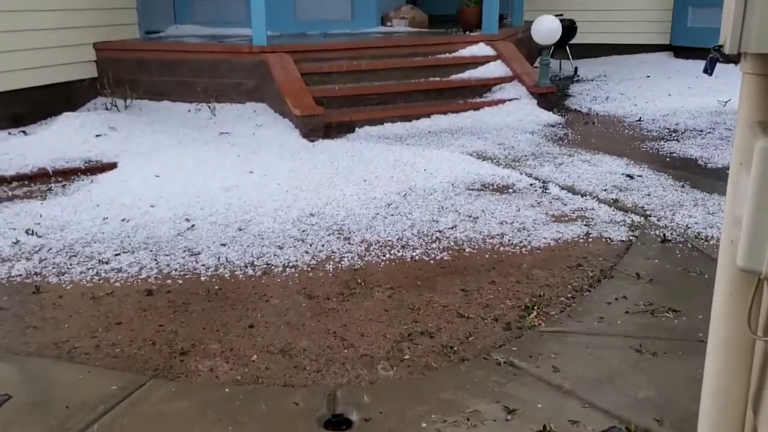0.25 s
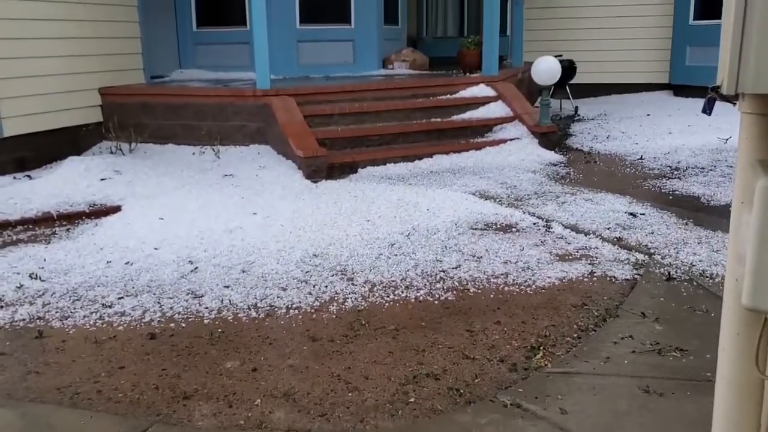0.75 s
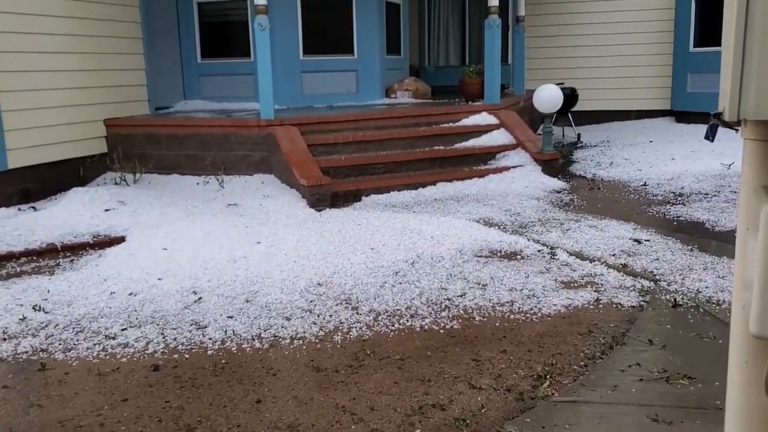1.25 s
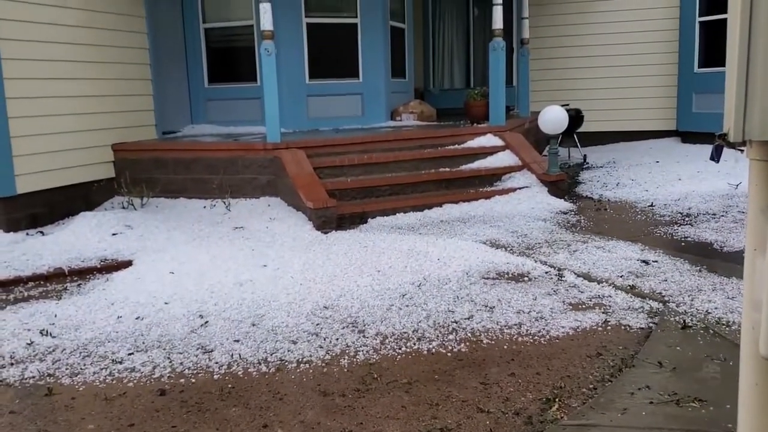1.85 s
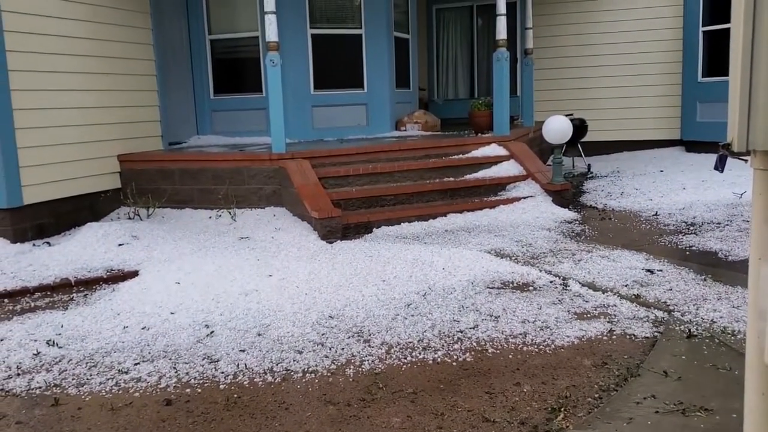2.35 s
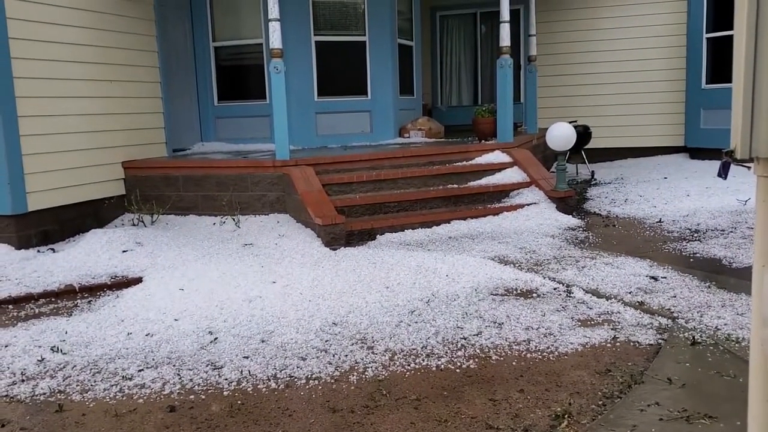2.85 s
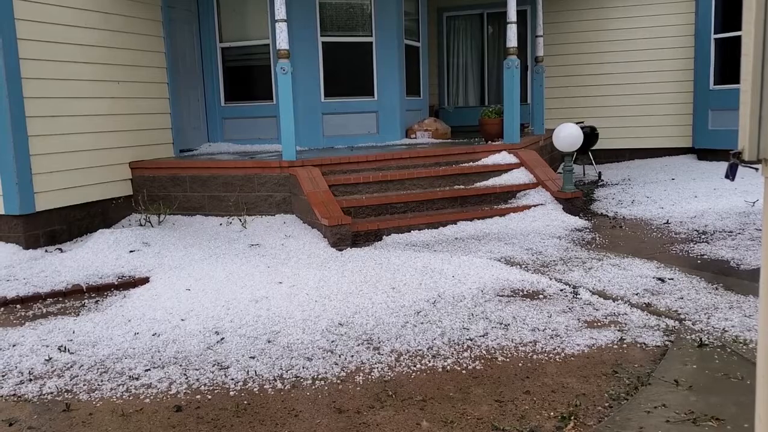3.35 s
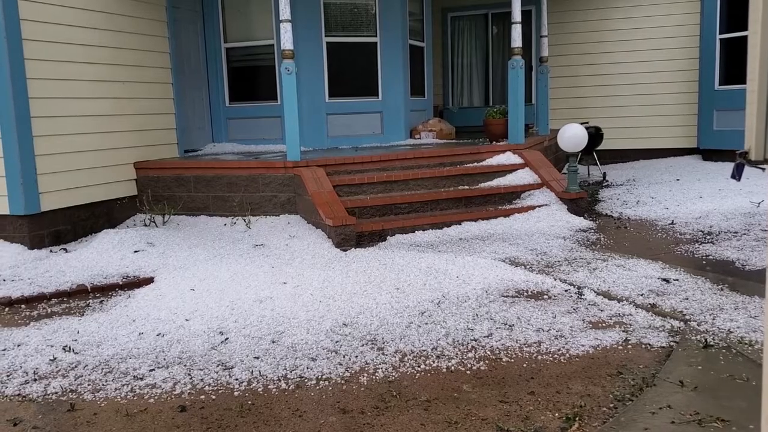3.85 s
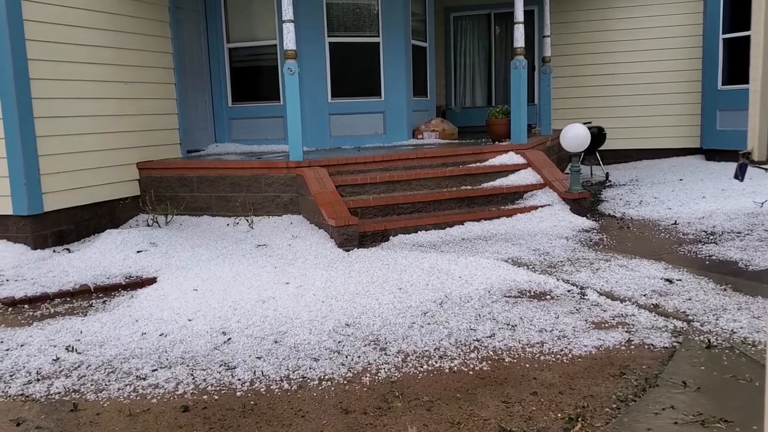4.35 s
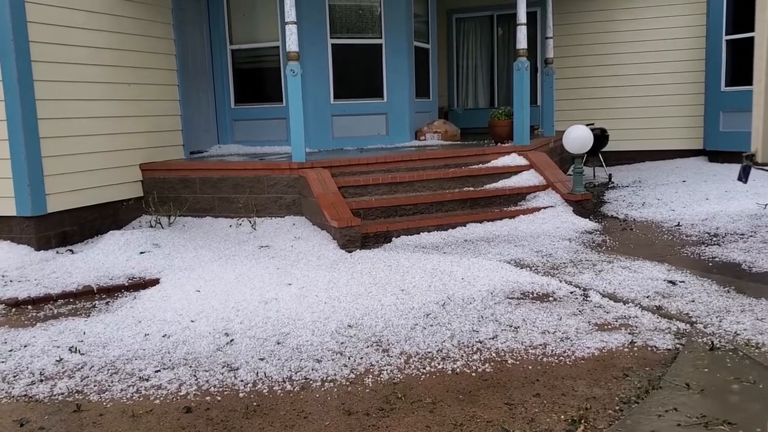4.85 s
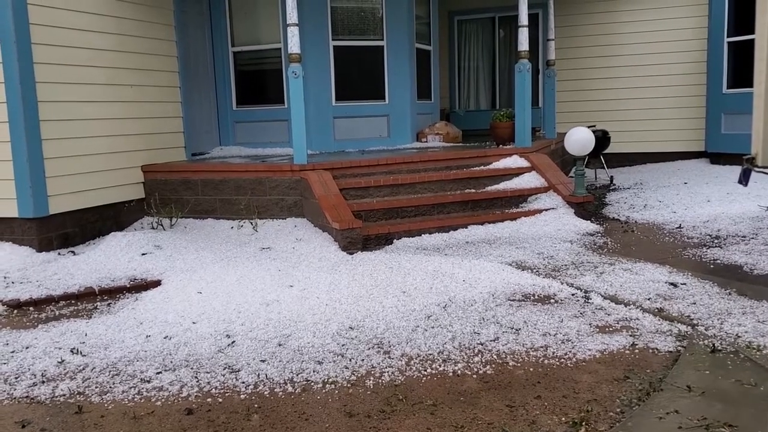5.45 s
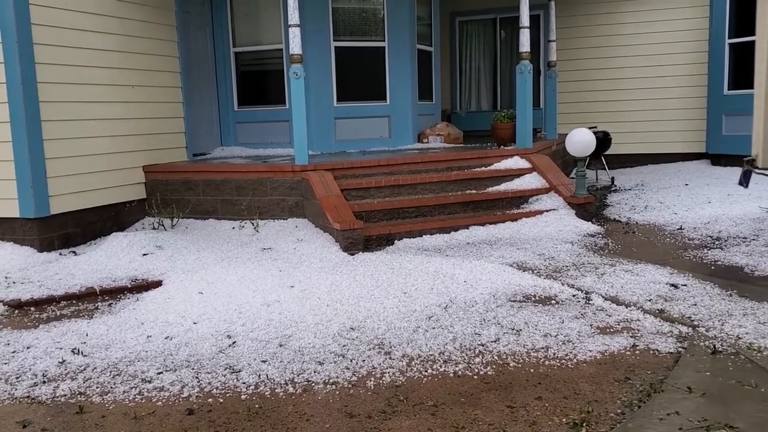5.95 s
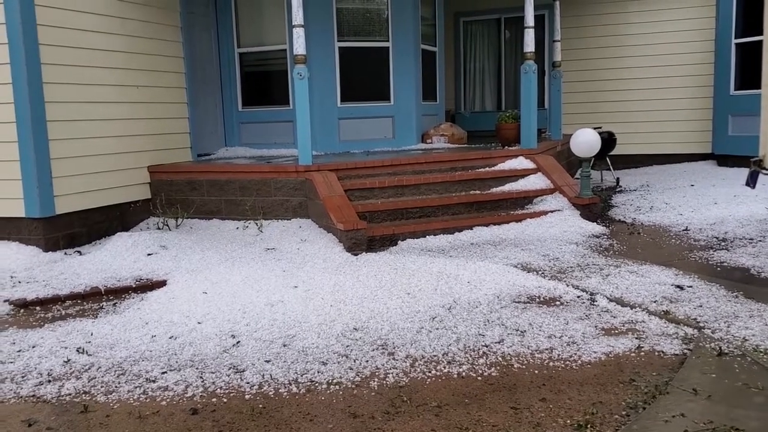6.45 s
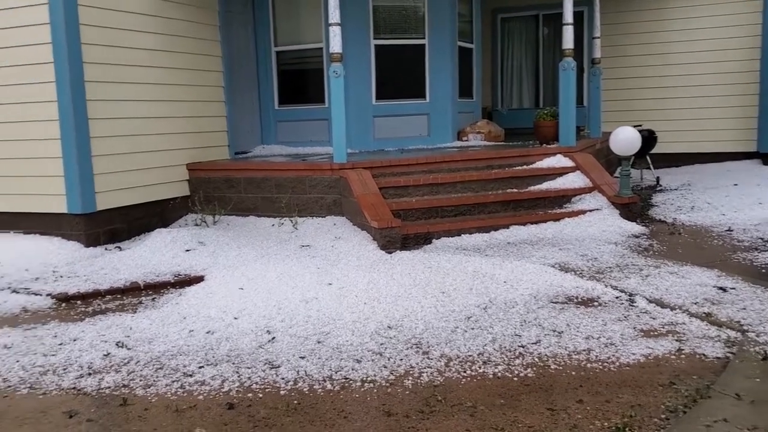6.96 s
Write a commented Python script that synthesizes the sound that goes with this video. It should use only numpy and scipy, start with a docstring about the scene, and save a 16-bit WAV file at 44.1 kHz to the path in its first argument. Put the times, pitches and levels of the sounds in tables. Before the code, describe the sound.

Outdoors by a house porch, close drops fall irregularly from the roof edge onto wet concrete, making crisp ticks and small bright splashes, some with a short hollow downpipe ring. Fine rain hisses quietly throughout with light patter. A deep, fluttering rumble surges beneath, stronger around three to four seconds and six. A few dull knocks on boards sit left. Close stereo microphones, only brief reflections.

```python
"""Rain after a hailstorm, heard from under a porch roof: drips splatter on concrete, a downpipe and boards,
finer rain hisses over the yard, and the storm rumbles low. Drops are bursts of impulses that excite
damped resonances; the hiss is patchy shaped noise with ticks; the storm is low noise over a wavering sine.
The two microphones sit a hand apart, so near drops reach the right one up to 0.43 ms late."""
import sys
import numpy as np
from scipy import signal
from scipy.fft import rfft, irfft, next_fast_len
from scipy.io import wavfile
from scipy.ndimage import uniform_filter1d, map_coordinates

SR = 44100
rng = np.random.default_rng(int(sys.argv[2]) if len(sys.argv) > 2 else 0)


def store_wav(level_fs):
    """Save 16-bit WAV to argv[1]."""
    pcm = np.round(np.clip(np.atleast_2d(level_fs), -1, 1) * 32767)
    wavfile.write(sys.argv[1], SR, pcm.T.astype(np.int16))


def voltage_ratio(decibels):
    """Convert decibels (scalar or array-like) to amplitude ratios, 20 dB per decade."""
    exponent = np.asarray(decibels, float) / 20
    return 10 ** exponent


N = 317961  # samples

# strength of the fine rain, which also scales the patter, and balance of the rain: start_s, level_db, left_right_db
RAIN_COURSE = [(0.0, -40.5, 1), (0.78, -41.5, 1), (1.2, -40, 1), (2.1, -42, 1), (2.99, -41, 0.5),
               (3.49, -41.5, 1), (4.5, -40.5, 1), (4.9, -37.5, 3), (6.04, -39, 3.5), (6.85, -37.5, 2.5),
               (7.21, -37.5, 3.5)]


def unit(x):
    """Normalization: scales a signal to rms 1."""
    return x / np.sqrt(np.mean(x ** 2) + 1e-20)


def along(points, hz):
    """Interpolates (frequency_hz, value) points on a logarithmic frequency axis."""
    point_hz, value = np.transpose(points)
    return np.interp(np.log(hz + 1), np.log(point_hz + 1), value)


def curves(rows):
    """Linear interpolation in time: one value per sample for each column after the time."""
    s, *columns = np.transpose(rows)
    return [np.interp(np.arange(N) / SR, s, column) for column in columns]


def filtered(x, response):
    """Linear filtering: multiplies the spectrum by a response that is a function of frequency in Hz."""
    size = next_fast_len(N + 8192)
    hz = np.fft.rfftfreq(size, 1 / SR)
    return irfft(rfft(x, size) * response(hz), size)[..., :N]


def sides(pan_db):
    """Intensity stereo: left and right gains for a left-right level difference."""
    return voltage_ratio(np.array([pan_db / 2, -pan_db / 2]))


def wobble(knots_per_s):
    """Random modulation: a smooth curve through normal random knots, at most 25 a second."""
    position = np.arange(N) * np.clip(knots_per_s, 1, 25) / SR
    return map_coordinates(rng.standard_normal(200), [position])


def rush(spectrum, patchy_db):
    """Shaped noise of rms 1: random time-frequency patches, and mid/side weights that set the ears' coherence."""
    # likeness of left and right, from -1 opposite to 1 equal: frequency_hz, likeness
    likeness = [(60, 1), (110, 0.94), (200, 0.87), (380, 0.83), (700, 0.43), (1290, -0.58), (2380, 0.32),
                (4400, -0.29), (8120, 0.0034), (15000, -0.17)]
    cells = signal.stft(rng.standard_normal((2, N)), nperseg=512)[2]
    field = uniform_filter1d(rng.standard_normal(cells.shape[1:]), 6, 0)
    field = unit(uniform_filter1d(field, 10, 1))
    pair = signal.istft(cells * voltage_ratio(patchy_db * field), nperseg=512)[1][:, :N]

    def mid_side_response(hz):
        # mid power minus side power gives the likeness
        angle = np.arccos(np.clip(along(likeness, hz), -1, 1)) / 2
        return voltage_ratio(along(spectrum, hz)) * [np.cos(angle), np.sin(angle)]

    mid, side = filtered(pair, mid_side_response)
    return unit(np.array([mid + side, mid - side]))


def storm():
    """Noise roll and frequency-modulated boom: each surge of the boom lifts the roll a little."""
    # sine amplitude before its surges, pitch before its sway: start_s, level_db, pitch_hz
    boom_course = [(0, -32, 57), (.12, -50, 57.5), (.22, -31.5, 61.8), (.8, -52, 65.2), (1.45, -38, 73.4),
                   (1.85, -35.5, 63.55), (2.25, -32, 60.03), (2.39, -76, 61.7), (2.49, -25, 64.95),
                   (2.68, -43, 68.2), (2.77, -25, 71), (2.88, -54, 61.65), (2.96, -26.5, 71.4),
                   (3.01, -45, 66), (3.08, -24, 72.3), (3.17, -37, 81.6), (3.24, -22, 95.6),
                   (3.31, -45, 80.5), (3.4, -37, 67), (3.47, -25, 66.3), (3.53, -40, 65.7), (3.6, -30, 66),
                   (3.75, -28.5, 64.7), (3.82, -20, 63.8), (3.87, -41, 65.7), (3.92, -25.5, 65.9),
                   (4.1, -61, 71), (4.2, -34, 64.6), (4.42, -25.5, 60.7), (4.9, -32.5, 56.4),
                   (5.3, -26, 55.37), (6.03, -23.5, 54.06), (6.1, -15, 58.2), (6.2, -28, 58),
                   (6.26, -28, 75.5), (6.33, -33, 60.03), (6.4, -34, 79.96), (6.47, -29, 64.76),
                   (6.56, -27, 63.9), (6.74, -33, 64.76), (6.84, -22, 66.03), (7.07, -24, 60.97),
                   (7.21, -38, 51)]
    # balance of the boom: start_s, left_right_db
    drift = [(0, -1), (4, 1.5), (5.5, -3), (7.21, -0.5)]
    # rms of the roll before its flutter and lift: start_s, level_db
    rumble_course = [(0, -37), (.3, -32), (1, -34.5), (1.58, -32), (2.4, -32.5), (3.2, -31.5), (4.1, -35),
                     (5.2, -32), (6.04, -32), (6.1, -29), (6.17, -32), (7.21, -34)]
    # relative spectrum of the roll: frequency_hz, level_db
    roll_spectrum = [(15, -40), (25, -28), (43, -4.5), (65, -1), (130, -8.5), (166, -9), (298, -20.5),
                     (339, -17), (380, -23.5), (426, -21.5), (560, -32), (738, -29.5), (1200, -34.5),
                     (1560, -66), (2640, -120)]
    # the higher rumble leans left: frequency_hz, left_right_db
    lean = [(100, 0), (400, 1)]
    surge_base_db, surges_per_s = 1.6, 22  # random knots a second
    steady_db, surge_per_db = -9, 0.09  # the surges deepen by this much per dB the boom lies under steady_db
    flutter_db, flutters_per_s = 1.5, 12
    bass_hz = 33.7  # half amplitude here, less below

    rumble_db, = curves(rumble_course)
    boom_db, pitch_hz = curves(boom_course)
    surge_depth_db = np.clip(surge_base_db + surge_per_db * (steady_db - boom_db), 0, 8)
    boom_db = boom_db + surge_depth_db * wobble(surges_per_s)
    rumble_db = rumble_db + flutter_db * wobble(flutters_per_s)
    surge_db = boom_db - uniform_filter1d(boom_db, SR // 2)
    roll = voltage_ratio(rumble_db + 0.056 * surge_db) * rush(roll_spectrum, patchy_db=0.5)

    # slow random phase: one part common to both ears, one apart for each
    sway = filtered(rng.standard_normal((3, N)), lambda hz: 1 / (1 + (hz / 12) ** 2))
    phase = 2 * np.pi * np.cumsum(pitch_hz) / SR
    phase = phase + 0.95 * unit(sway[0]) + 0.5 * unit(sway[1:])
    boom = voltage_ratio(boom_db) * sides(curves(drift)[0]) * np.sin(phase)
    return filtered(roll + boom, lambda hz: sides(along(lean, hz)) / (1 + (bass_hz / (hz + 1)) ** 3))


def hiss():
    """Superposition of fine rain over yard and roofs: a noise wash with countless tiny decaying ticks in it."""
    # relative spectrum of the fine rain: frequency_hz, level_db
    spectrum = [(290, -0.5), (500, -0.5), (554, -1.5), (742, 1.5), (924, -2), (1290, 0.5), (2220, -1),
                (2610, -3.5), (4050, -2), (6100, -4.5), (7000, -8), (8060, -8.5), (9200, -10),
                (11400, -5.5), (15100, -9), (15800, -5), (16500, -56)]
    hiss_db, pan_db = curves(RAIN_COURSE)
    size = voltage_ratio(4 * np.clip(rng.standard_normal((2, N)), -2, 2))
    impulses = (rng.random((2, N)) < 500 / SR) * size  # about 500 a second at each ear
    t = np.arange(256) / SR
    tick = voltage_ratio(-60 * t / .004) * rng.standard_normal((2, len(t)))  # falls 60 dB in 4 ms
    ticks = signal.fftconvolve(impulses, tick, axes=1)[:, :N]
    ticks = unit(filtered(ticks, lambda hz: voltage_ratio(along(spectrum, hz)) * np.clip(hz / 2500, 0, 1) ** 2))
    wash = rush(spectrum, patchy_db=2.17)
    return voltage_ratio(hiss_db) * sides(pan_db) * (wash + voltage_ratio(-8.5) * ticks)


def splats(s, sharp, bodies, echo_db, spread_s):
    """Impulse excitation of resonances: a blow among droplets sounds its bodies (dB, Hz, width Hz, t60 s)."""
    length, lead, droplets = 4096, 512, 28  # samples, samples kept ahead of the blow, count
    ear_lag_s = .00043  # largest delay at the right microphone
    span_s = .006  # a body's dB is its energy spread evenly over this time
    wall_s, wall_db, wall_hz = .0065, -7, 4500  # mean delay, level, pitch where the wall's dulling halves the echo
    t, f = np.arange(length - lead) / SR, np.fft.rfftfreq(length, 1 / SR)

    # sharp is the share of energy in the one blow; the sharper, the closer the droplets
    when, size, side = rng.standard_normal((3, len(s), droplets))
    sharp = np.clip(sharp, 0, 1)[:, None]
    when = spread_s * (1.2 - sharp) * (np.abs(when) - .5 * (1 - sharp))
    when = np.column_stack([0 * s, np.clip(when, -lead / SR, None)])
    size = np.column_stack([np.sqrt(sharp), np.sqrt((1 - sharp) / droplets) * size])
    lag = ear_lag_s * np.column_stack([0 * s + 1, np.abs(np.tanh(side + .5))])
    blows = np.zeros((2, len(s), length))
    for ear, late in zip(blows, (0, lag)):
        place = lead + np.round((when + late) * SR).astype(int)
        np.add.at(ear, (np.arange(len(s))[:, None], place), size)
    struck = rfft(blows)

    # a near wall sends each drop back once
    wall_delay = wall_s * (.9 + .2 * rng.random((len(s), 1)))
    wall = voltage_ratio(wall_db) * np.exp(-2j * np.pi * f * wall_delay) / (1 + (f / wall_hz) ** 2)
    total = 0
    for level_db, hz, width, t60 in bodies:
        # the porch answers each blow with a short noisy tail
        tail = voltage_ratio(echo_db - 60 * t / t60) * rng.standard_normal((2, len(s), len(t)))
        answer = 1 + wall + rfft(tail * (1 - np.exp(-t / 0.00029)), length)
        hz, width = np.reshape(hz, (-1, 1)), np.reshape(width, (-1, 1))
        resonance = 1j * f * width / (hz * hz - f * f + 1j * f * width)
        ring = resonance ** 2 * answer * struck  # applied twice
        energy = 2 * np.sum(np.abs(ring) ** 2, (0, 2)) / (2 * length)  # mean of the two ears
        total = total + (voltage_ratio(level_db) * np.sqrt(span_s * SR / energy))[:, None] * ring
    sound = irfft(total, length)
    place = np.round(s * SR).astype(int)[:, None] + np.arange(length)
    return np.array([np.bincount(place.ravel(), ear.ravel(), N + 2 * length)[lead:N + lead] for ear in sound])


def drops(rows, echo_db, spread_s, modes=()):
    """Modal sum for water on concrete: a pitched splash with an overtone, a bright spray, the downpipe's ring."""
    s, pipe_db, splash_db, hz, spray_db, sharp = np.transpose(rows)
    overtone = 1.47 + .12 * rng.random(len(s))
    bodies = [(pipe_db, 2250, 560, .1)]
    bodies += [(pipe_db + db, *mode) for db, *mode in modes]
    bodies += [(splash_db, hz, .3 * hz, .08), (splash_db - 4.5, hz * overtone, .3 * hz, .08)]
    bodies += [(spray_db, 11500, 6000, .06)]
    return sides(curves(RAIN_COURSE)[1]) * splats(s, sharp, bodies, echo_db, spread_s)


def patter(count=800):
    """Random superposition: many small drops of random size and colour, louder as the shower thickens."""
    s, sharp = rng.random((2, count))
    size_db = 3.2 * np.clip(rng.exponential(size=count), 0, 2.1)
    pipe, splash, pitch, spray = rng.standard_normal((4, count))
    # levels are relative to the course of the shower
    pipe_db = size_db - 28.0 + 5 * pipe
    splash_db = size_db - 11.5 + 4 * splash
    spray_db = size_db - 16.0 + 4 * spray
    pitch_hz = 4600 * np.exp(.3 * pitch)
    rows = np.column_stack([s * N / SR, pipe_db, splash_db, pitch_hz, spray_db, .6 * sharp])
    return voltage_ratio(curves(RAIN_COURSE)[0]) * drops(rows, echo_db=-28, spread_s=.004)


def drips():
    """Impact spectra of loud drops from the roof edge: louder and brighter ones are sharper blows, faintly echoed."""
    # near drips, levels before panning: start_s, pipe_db, splash_db, splash_pitch_hz, spray_db
    near_drips = [(0.005, -48.5, -38.5, 4940, -34.5), (0.1116, -59, -32.5, 3460, -39),
                  (0.1204, -59, -39.5, 3580, -38.5), (0.184, -65, -37, 3340, -38.5),
                  (0.26, -46, -38, 3430, -46.5), (0.335, -64, -42, 5900, -41),
                  (0.444, -64, -42.5, 5500, -28), (0.618, -60, -50, 6000, -45),
                  (0.747, -64, -45, 4860, -37), (1.1, -41.5, -33.5, 4400, -41.5),
                  (1.115, -47, -36.5, 3930, -36.5), (1.124, -52, -35, 3550, -46),
                  (1.135, -48, -40, 4400, -43), (1.27, -61, -31, 5540, -33), (1.325, -47, -32.5, 3780, -50),
                  (1.3766, -54, -44, 4570, -40), (1.394, -47, -37, 4150, -36),
                  (1.4138, -48, -39.5, 4730, -43), (1.5403, -37.5, -44, 4880, -42.5),
                  (1.615, -64, -41, 4900, -50), (1.74, -36.5, -56, 4890, -43), (1.849, -60, -38, 6240, -39),
                  (2.039, -66, -43, 6800, -42), (2.105, -62, -51, 6000, -43),
                  (2.167, -43, -34.5, 3790, -40), (2.236, -41, -29, 3760, -34),
                  (2.345, -63, -54, 6000, -42), (2.417, -56, -38.5, 3366, -49),
                  (2.4367, -36.5, -23, 3830, -29.5), (2.446, -47, -32, 3303, -42),
                  (2.469, -58, -30.5, 3170, -38), (2.5353, -58, -36.5, 5880, -56.5),
                  (2.7153, -58, -32.5, 4860, -29.5), (2.718, -62, -29, 6600, -28),
                  (2.762, -62, -39, 5600, -39.5), (2.8041, -45, -38, 4200, -36),
                  (2.9238, -61, -38.5, 6590, -52), (2.997, -63, -54, 5223, -37.5),
                  (3.1697, -45, -34.5, 4067, -37.5), (3.4948, -59, -34, 6110, -32),
                  (3.58, -62, -52, 6080, -41), (3.6054, -62, -32.5, 4410, -35),
                  (3.7275, -63, -27, 3600, -29.5), (3.853, -60, -36, 5330, -34.5),
                  (3.9614, -28.5, -29, 4085, -36.5), (4.0547, -54, -35, 5405, -49.5),
                  (4.194, -64, -33, 4070, -53), (4.3524, -58, -35.5, 6580, -40.5),
                  (4.369, -43, -36, 3594, -36), (4.6613, -56, -36.5, 4480, -33),
                  (4.7872, -48, -55, 4013, -32), (5.2583, -46.5, -34, 4884, -48),
                  (5.4174, -57, -32.5, 4390, -37), (5.5503, -59, -38.5, 5530, -38),
                  (5.6518, -60, -35.5, 4716, -48.5), (5.781, -50, -55, 6650, -34.5),
                  (5.8808, -55, -45, 6570, -35), (6.02, -60, -51, 5995, -39),
                  (6.058, -42, -24.5, 3890, -30), (6.2415, -60, -50, 6044, -44),
                  (6.2532, -40, -32, 4510, -30), (6.2598, -40, -21, 3360, -25),
                  (6.2626, -31, -23.5, 4270, -30.5), (6.487, -60, -36, 5974, -44),
                  (6.5381, -48, -34.5, 6210, -49), (6.594, -37.5, -34, 2460, -52.5),
                  (6.601, -39, -47, 4200, -53), (6.6484, -41, -35.5, 2470, -52),
                  (6.6555, -40, -52, 3400, -58), (6.884, -50, -32.5, 3860, -47),
                  (6.888, -44, -28, 4320, -47.5), (6.894, -49, -33.5, 3296, -48),
                  (6.9123, -37, -29.5, 4440, -29.5), (6.987, -52, -35, 3685, -48)]
    # the downpipe's longer ring: level_db (re its knock), pitch_hz, width_hz, t60_s (under the porch)
    pipe_modes = [(-5, 2030, 110, .07), (-3, 2250, 110, .07), (-6, 2480, 110, .07)]
    rows = np.array(near_drips)
    splash_db, spray_db = rows[:, 2], rows[:, 4]
    loudest_db = np.max(rows[:, [1, 2, 4]], axis=1)
    # share of energy in the one blow: .6 at -30 dB with spray equal to splash
    sharp = .6 + .018 * (loudest_db + 30) + .012 * np.clip(spray_db - splash_db, -8, 8)
    return drops(np.column_stack([rows, sharp]), echo_db=-31, spread_s=.003, modes=pipe_modes)


def thuds():
    """Struck-plate resonance: heavy drops knock on boards to the left, over a low body tone."""
    # heavy drops, levels before panning: start_s, knock_db, knock_pitch_hz, body_db
    board_drops = [(1.539, -29, 1510, -39), (1.563, -50, 750, -30), (1.828, -34, 1065, -35),
                   (1.853, -34.5, 1090, -41), (2.994, -41, 632, -45), (4.844, -35, 1818, -45),
                   (5.174, -34, 1920, -48), (5.555, -32, 920, -40), (5.763, -35.5, 728, -40)]
    s, knock_db, hz, body_db = np.transpose(board_drops)
    bodies = [(knock_db, hz, 1.14 * hz, .1), (body_db, 265, 120, .2)]
    return sides(np.array([4])) * splats(s, 0 * s + 0.465, bodies, echo_db=-27, spread_s=0.00298)


def scene():
    """Linear superposition of every source at the two microphones."""
    return storm() + hiss() + patter() + drips() + thuds()


def low_pass(x):
    """Removes everything above the highest recorded frequency."""
    return signal.sosfilt(signal.butter(12, 16820, fs=SR, output="sos"), x)


def record(dry):
    """Microphone frequency response: a dip near 8 kHz, a steep cut of the top, and a treble balance."""
    # the left microphone gains on the right toward the top: frequency_hz, left_right_db
    treble_lean = [(8000, -0.5), (13000, 0.2)]
    top_hz = 15900  # the cut begins here

    def response(hz):
        dip_db = -3 * np.exp(-((hz - 8000) / 700) ** 2)
        cut_db = -30 * np.clip((hz - top_hz) / 150, 0, 1.5)
        return voltage_ratio(dip_db + cut_db) * sides(along(treble_lean, hz))

    heard = filtered(dry, response)
    return low_pass(heard)


dry = scene()
out = record(dry)
store_wav(out)
```